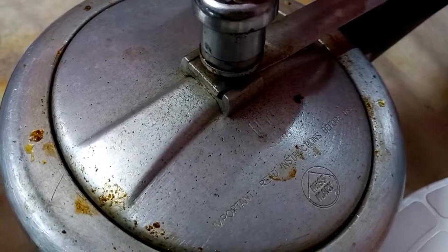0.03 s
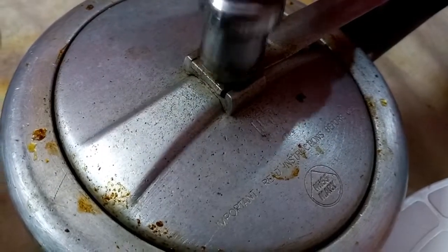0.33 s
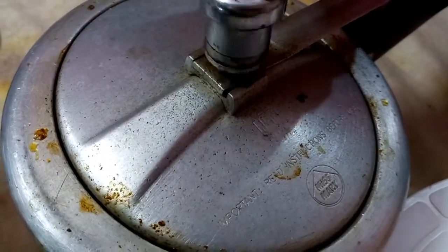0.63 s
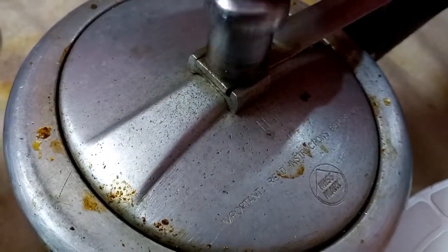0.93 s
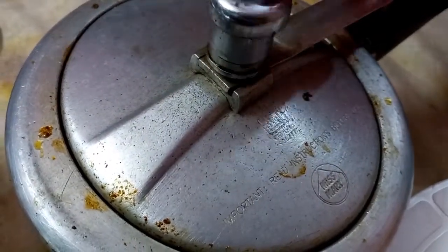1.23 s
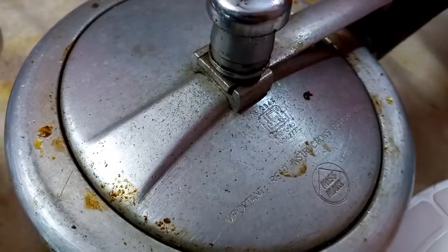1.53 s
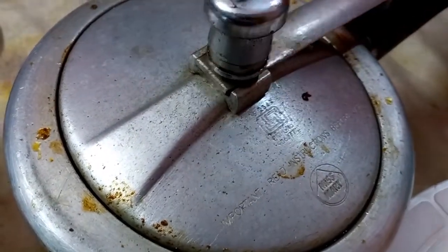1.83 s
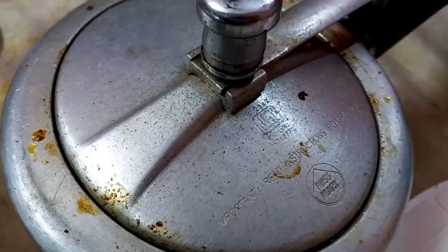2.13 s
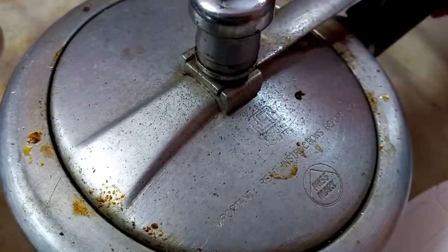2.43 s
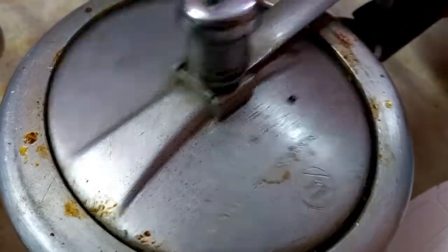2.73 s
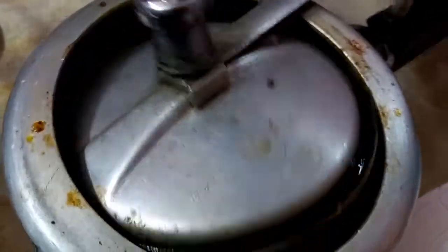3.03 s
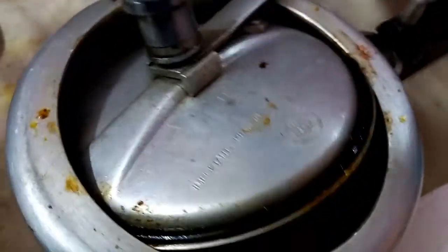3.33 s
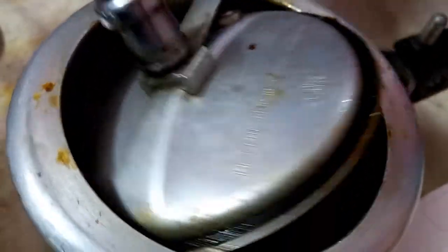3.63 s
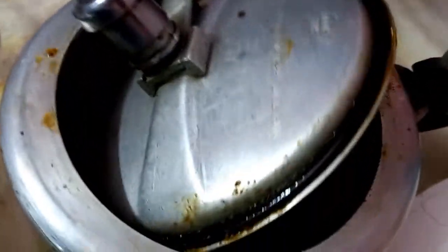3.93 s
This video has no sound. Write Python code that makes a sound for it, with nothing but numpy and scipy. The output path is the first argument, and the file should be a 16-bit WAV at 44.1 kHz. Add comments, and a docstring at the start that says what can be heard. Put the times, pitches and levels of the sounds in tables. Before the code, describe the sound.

A pressure cooker's metal valve weight clacks irregularly from 0.3 to 1.4 seconds, close by, while a steam hiss fades over low rumble and soft thumps. Around 1.8 seconds the handle rubs and its wire catch clicks free. The weight ticks once at 2.5 seconds. The lid drops loose with two clunks near 2.9 and 3.15 seconds, then scrapes along the rim with lighter knocks until 4 seconds.

```python
"""A pressure cooker, close by in a small kitchen, over a low handling rumble.
Until 1.5 s the last steam hisses out and fades while the valve weight clacks on the vent.
Near 1.8 s the handle is squeezed, its wire catch slips off and the handle springs free.
The weight ticks once more; near 2.9 s and 3.15 s the lid drops loose with two clunks,
then scrapes along the rim as it is tilted out."""
import sys
import numpy as np
from scipy import signal
from scipy.fft import rfft, irfft
from scipy.io import wavfile

SR = 44100
rng = np.random.default_rng(int(sys.argv[2]) if len(sys.argv) > 2 else 0)


def to_wav(sig):
    """Store sig (one row per channel, or 1-D mono) as 16-bit WAV at the path in sys.argv[1].

    Samples outside -1..1 are clipped; the rate is SR.
    """
    pcm = np.clip(np.atleast_2d(sig), -1, 1) * 32767
    pcm = np.round(pcm).astype(np.int16)
    wavfile.write(sys.argv[1], SR, pcm.T)  # frames by channels


N = 176400

# room noise spectrum: freq_hz, gain_db
FLOOR_EQ = [(130, -6.5), (330, 2.5), (870, -6.5), (2060, -5), (3350, -16), (16000, -34)]
FLOOR_DB = -44

# handling rumble envelope: time_s, level_db
RUMBLE_ENV = [(0, -28), (.25, -37), (.43, -32.5), (.55, -35), (1.0, -40), (1.1, -26.5), (1.25, -51),
              (1.65, -28.5), (1.93, -36), (1.98, -51), (2.8, -44), (3.8, -41.5)]
# rumble spectrum: freq_hz, gain_db
RUMBLE_EQ = [(45, -30), (72, -2), (120, -5), (240, -19), (380, -28)]
RUMBLE_SIDE_GAIN, RUMBLE_SWELL_DB = 0.74, 3
# dull low thumps, from handling and from the valve weight landing: start_s, level_db
BUMPS = [(0.452, -14.5), (1.06, -16), (1.091, -15), (1.331, -16.5), (1.468, -20), (1.588, -13),
         (1.636, -19)]
BUMP_HZ, BUMP_RISE_S, BUMP_T60_S = 138.7, 0.0032, 0.09

# steam flow envelope: time_s, level_db
STEAM_ENV = [(0, -24), (.3, -29.5), (.42, -36.5), (.62, -36.5), (1.3, -46), (1.5, -62), (4, -51)]
# jet spectrum: freq_hz, gain_db
JET_EQ = [(400, -6), (800, -8), (2000, -6), (2700, -13), (3800, -10.5), (4500, -4), (6300, 3), (7400, 1),
          (8400, -14), (10000, -12), (11900, -5.5), (14000, -14)]
STEAM_FLICKER_DB = 1.5

# rub of the squeezed handle: time_s, level_db
SQUEEZE_ENV = [(1.72, -65), (1.81, -29.5), (1.85, -36), (1.93, -40), (2.02, -92)]
# handle rub and tick spectrum: freq_hz, gain_db
SQUEEZE_EQ = [(250, -14.5), (590, 7), (850, -10), (1800, -9.5), (2090, 1), (2400, -8), (16000, -25.5)]
# wire catch slipping over the handle: start_s, level_db, ring_rel_db
CATCH_SLIPS = [(1.75, -29.5, -21), (1.8762, -21.5, -4.5), (1.9089, -20, 2.5), (1.9347, -18.5, -8),
               (1.949, -27, 4.5), (1.9926, -30, -3), (2.951, -14, -24)]
# wire mode: pitch_hz, t60_s, level_db
CATCH_MODES = [(11180, 0.064, -2)]
# catch click spectrum: freq_hz, gain_db
CATCH_EQ = [(2000, -4.5), (2800, -8), (3600, -2), (5300, 2), (9000, -5.5), (12300, 2.5), (16000, -14)]
CATCH_T60_S = 0.054
RASP_HZ, RASP_WIDTH_HZ, RASP_DB, RASP_T60_S = 2830, 360, -9.5, 0.2  # rough ring of the wire
# sprung handle letting go: start_s, level_db
HANDLE_SNAPS = [(2.058, -26.5), (2.2148, -33)]
# handle modes: pitch_hz, t60_s, level_db
HANDLE_MODES = [(337, 0.14, -7), (581.3, 0.11, -1), (604, 0.73, -13.5), (1210, 0.058, -15),
                (2076, 0.26, -10.5)]
HANDLE_TICK_DB, HANDLE_TICK_T60_S = -4, 0.15

# lid hitting the rim: start_s, level_db, low_mode_rel_db
LID_KNOCKS = [(2.6651, -31, -15), (2.7936, -22, -22), (2.9035, -21, -15), (2.9125, -10.5, -22),
              (2.9165, -11, -10), (2.9265, -13.5, -26), (2.9369, -7, -6.5), (2.947, -16, -13),
              (2.9735, -14.5, 5.5), (2.981, -17.5, -6), (3.1374, -11, 0.5), (3.1432, -7, -23),
              (3.153, -12, 6.5), (3.1605, -11, -17), (3.17, -13, -3), (3.181, -19.5, 7), (3.4214, -28, 11),
              (3.601, -13, -0.5), (3.619, -28, 11.5), (3.9157, -21.5, 4.5), (3.9575, -40, -11),
              (3.9788, -21, -11)]
# lowest lid mode: pitch_hz, t60_s, level_db
LID_LOW_MODE = [(473.6, 0.065, -3.5)]
# lid mode rung as the seal lets go: pitch_hz, t60_s, level_db
LID_RELEASE_MODE = [(730, 0.15, 0)]
RELEASE_S, RELEASE_DB = 2.9125, -11
# upper lid modes: pitch_hz, t60_s, rel_db
LID_MODES = [(980, 0.13, -44), (1071, 0.11, -22), (1564, 0.12, -19.5), (2296, 0.14, -21.5),
             (3100, 0.041, -13), (3730, 0.029, -8.5), (4430, 0.03, -7.5), (5100, 0.03, -12.5),
             (5515, 0.033, -6.5)]
# metal-on-metal chatter spectrum: freq_hz, gain_db
CHATTER_EQ = [(100, -19), (480, -3.5), (1300, -3), (1950, -12), (3900, -2.5), (6200, -7.5), (9500, -19),
              (16000, -24.5)]
CHATTER_GRAIN_DB, CHATTER_T60_S, CHATTER_RING_DB = 2.5, 0.031, -8
# lid sliding on the rim: time_s, level_db
SLIDE_ENV = [(2.5, -67), (2.68, -44), (2.86, -38), (3.07, -47.5), (3.12, -29), (3.21, -48), (3.38, -47),
             (3.43, -34), (3.55, -39.5), (3.75, -31), (3.88, -33), (4.0, -40)]
# sliding friction spectrum: freq_hz, gain_db
SLIDE_EQ = [(210, 2.5), (360, -7.5), (480, -2), (650, -13), (930, -8), (4350, -22.5), (16000, -33.5)]
SLIDE_GRAIN_DB, SLIDE_GRAIN_HZ, SLIDE_JERK_DB, SLIDE_RING_DB = 4, 701.4, 2, -4
GRIT_PER_S, GRIT_DB = 64, -15

# weight hitting the vent pipe: start_s, level_db, crack_rel_db, ping_rel_db
CLACKS = [(0.3324, -5.5, -3.5, 0), (0.4457, -16, 2.5, 7), (0.4509, -8.5, 5, -5), (0.6203, -2, -14.5, -11),
          (0.6285, -6, -4.5, -23), (0.713, -15, -3, -5), (0.7789, -6, -6.5, -29), (0.7898, -5.5, -4.5, -8),
          (0.884, -18.5, 3, 7.5), (0.8911, -19, 3.5, 8.5), (.9538, -6, -5.5, -18), (0.9629, -6, -6, -1.5),
          (1.0609, -13, -2.5, 6), (1.115, -10, -11, -5), (1.1215, -1.5, -4, -9.5), (1.2263, -20, -0.5, 3),
          (1.2398, -17, -1.5, 3.5), (1.3142, -11.5, -7.5, -28), (1.3292, 0, -8, -7),
          (1.342, -10.5, -6, 0.5), (2.5001, -20, 4.5, 4)]
# weight modes: pitch_hz, t60_s, left_db, right_db
WEIGHT_MODES = [(2384, 0.042, -18, -42), (2900, 0.027, -24, -19), (3666, 0.021, -4.5, -22),
                (4320, 0.0093, -1.5, -14), (7690, 0.028, -30.5, -21)]
# ping mode of the weight: pitch_hz, t60_s, left_db, right_db
WEIGHT_PING = [(5550, 0.033, -42, 0)]
CLACK_DETUNE_FRAC, PING_DETUNE_FRAC, STRIKE_SPREAD_DB = 0.025, .007, 3.5  # no two landings alike
# contact crack spectrum: freq_hz, gain_db
CRACK_EQ = [(80, -4), (300, -1), (1500, -2.5), (1900, -21), (2400, -5.5), (5000, 2), (9500, -17.5),
            (12000, -13), (16000, -25)]
CRACK_T60_S = 0.018
THUMP_DB, THUMP_DAMPING_T60_S = -11, 0.056  # a hard landing also thumps the lid

# reverb spectrum: freq_hz, gain_db
ROOM_EQ = [(300, -5), (3000, 4.5), (15000, 0.5)]
ROOM_DB, ROOM_T60_S, WALL_DELAY_S = -10, 0.19, .012
# microphone balance: freq_hz, left_minus_right_db
MIC_BALANCE = [(300, 4.5), (1300, 0.5), (5600, -0.5), (8000, 1.5), (12300, -8.5), (16000, -4)]
RIGHT_LAG_S, LOWPASS_HZ = .00015, 16000


def undb(db):
    """Decibels to gain."""
    return 10 ** (np.asarray(db) / 20)


def unit(x):
    """Scale to rms 1."""
    return x / np.sqrt(np.mean(x ** 2))


def envelope(points):
    """Gain over time from (time_s, level_db) points."""
    return undb(np.interp(np.arange(N) / SR, *np.array(points).T))


def convolve(x, response):
    """Apply an impulse response; keep N samples."""
    return signal.fftconvolve(np.atleast_2d(x), response, axes=1)[:, :N]


def min_phase(x, bin_db):
    """Causal filter with a gain per frequency bin."""
    cepstrum = irfft(np.log(undb(np.atleast_2d(bin_db))))
    fold = np.r_[1, np.full(N // 2 - 1, 2), np.zeros(N // 2)]
    response = irfft(np.exp(rfft(cepstrum * fold)))
    return convolve(x, response[:, :N // 20])


def eq(x, points):
    """Filter by (freq_hz, gain_db) points, rolling off outside them; keeps white-noise power."""
    hz, db = np.array(points, float).T
    log_hz = np.log(hz)
    log_bins = np.log(np.maximum(np.fft.rfftfreq(N, 1 / SR), 1))
    low_cut_db = 40 * np.maximum(log_hz[0] - log_bins, 0)
    high_cut_db = 20 * np.maximum(log_bins - log_hz[-1], 0)
    gain = unit(undb(np.interp(log_bins, log_hz, db) - low_cut_db - high_cut_db))
    return min_phase(x, 20 * np.log10(gain))


def wander(rate_hz):
    """Smooth random motion, rms 1."""
    points = rng.standard_normal(N)
    return unit(np.interp(np.arange(N) / SR * rate_hz, np.arange(N), points))


def decay(t60_s):
    """Exponential decay, 0.5 s long."""
    return np.exp(-np.log(1000) * np.arange(SR // 2) / SR / t60_s)


def ring(modes):
    """Damped sines of a struck body; one level, or one per side."""
    t = np.arange(SR // 2) / SR
    return sum(undb(db)[:, None] * decay(t60_s) * np.sin(2 * np.pi * hz * t) for hz, t60_s, *db in modes)


def detuned(mode, spread_frac):
    """One mode, randomly off pitch."""
    hz, *rest = mode
    return ring([(hz * (1 + spread_frac * rng.standard_normal()), *rest)])


def stereo_noise(size):
    """Noise: bass shared, treble independent per side."""
    shared, own = rng.standard_normal(size), rng.standard_normal((2, size))
    low, high = (signal.butter(2, 1000, kind, fs=SR) for kind in ("low", "high"))
    return signal.lfilter(*low, shared) + signal.lfilter(*high, own)


def burst(t60_s, grain_db=0):
    """Dying contact noise; grain_db roughens it into tiny impacts."""
    grains = undb(grain_db * np.repeat(rng.standard_normal(SR // 20), 20))[:SR // 2]
    noise = stereo_noise(SR // 2) * grains * decay(t60_s)
    return unit(noise) * np.sqrt(np.mean(decay(t60_s) ** 2))


def add(out, start_s, sound):
    """Mix a sound in at start_s."""
    i = int(start_s * SR)
    out[:, i:i + sound.shape[1]] += sound[:, :N - i]


def room_noise():
    """Quiet, steady noise floor."""
    return undb(FLOOR_DB) * eq(stereo_noise(N), FLOOR_EQ)


def kitchen(x):
    """Add short reverb, starting at the nearest wall's echo."""
    tail = stereo_noise(SR // 2) * decay(ROOM_T60_S)
    tail /= np.sqrt(np.sum(tail ** 2) / 2)
    wet = np.zeros((2, N))
    add(wet, WALL_DELAY_S, convolve(x.mean(axis=0), tail))
    return x + undb(ROOM_DB) * eq(wet, ROOM_EQ)


def microphones(x):
    """Bass leans left, high treble right; sound reaches the left first."""
    balance_db = np.interp(np.fft.rfftfreq(N, 1 / SR), *np.array(MIC_BALANCE).T)
    left, right = min_phase(x, np.array([balance_db, -balance_db]) / 2)
    late_right = np.pad(right, (int(RIGHT_LAG_S * SR), 0))[:N]
    return np.array([left, late_right])


def rumble_and_thumps():
    """Swelling handling rumble; dull low thumps from handling and from the valve weight landing."""
    mid, side = rng.standard_normal((2, N))
    noise = mid + RUMBLE_SIDE_GAIN * side * np.array([[1], [-1]])
    out = unit(eq(noise, RUMBLE_EQ)) * envelope(RUMBLE_ENV) * undb(RUMBLE_SWELL_DB * wander(rate_hz=14))
    attack = 1 - np.exp(-np.arange(SR // 2) / SR / BUMP_RISE_S)
    bump = attack * ring([(BUMP_HZ, BUMP_T60_S, -2), (BUMP_HZ * 1.67, BUMP_T60_S / 2, -2)])
    for start_s, db in BUMPS:
        add(out, start_s, undb(db) * bump)
    return out


def steam():
    """The jet dies down as pressure falls; a faint hiss then creeps back."""
    jet = eq(stereo_noise(N), JET_EQ)
    return jet * envelope(STEAM_ENV) * undb(STEAM_FLICKER_DB * wander(rate_hz=24.87))


def latch():
    """The squeezed handle rubs, its wire catch clicks and rings, the handle springs free."""
    tones, clicks, ticks, rasp = np.zeros((4, 2, N))
    wire, handle = ring(CATCH_MODES), ring(HANDLE_MODES)
    for start_s, db, ring_db in CATCH_SLIPS:
        add(tones, start_s, undb(db + ring_db) * wire)
        add(clicks, start_s, undb(db) * burst(CATCH_T60_S, grain_db=4.0))
        add(rasp, start_s, undb(db + ring_db + RASP_DB) * burst(RASP_T60_S))
    band = signal.butter(2, [RASP_HZ - RASP_WIDTH_HZ / 2, RASP_HZ + RASP_WIDTH_HZ / 2], "band", fs=SR)
    tones += signal.lfilter(*band, rasp) * np.sqrt(SR / 2 / RASP_WIDTH_HZ)  # make-up gain
    for start_s, db in HANDLE_SNAPS:
        add(tones, start_s, undb(db) * handle)
        add(ticks, start_s, undb(db + HANDLE_TICK_DB) * burst(HANDLE_TICK_T60_S, grain_db=-6.5))
    rub = unit(stereo_noise(N) * undb(1.9 * wander(rate_hz=420))) * envelope(SQUEEZE_ENV)
    return tones + eq(clicks, CATCH_EQ) + eq(rub + ticks, SQUEEZE_EQ)


def lid():
    """The lid breaks its seal, bounces, then scrapes over grit; knocks and friction ring it."""
    tones, chatter = np.zeros((2, 2, N))
    low_mode, body = ring(LID_LOW_MODE), ring(LID_MODES)
    body /= np.sqrt(np.sum(body ** 2))
    add(tones, RELEASE_S, undb(RELEASE_DB) * ring(LID_RELEASE_MODE))
    for start_s, db, low_db in LID_KNOCKS:
        add(tones, start_s, undb(db + low_db) * low_mode)
        add(chatter, start_s, undb(db) * burst(CHATTER_T60_S, CHATTER_GRAIN_DB))
    knocks = eq(chatter, CHATTER_EQ) + undb(CHATTER_RING_DB) * convolve(chatter, body)
    friction = stereo_noise(N)
    roughness_db = SLIDE_GRAIN_DB * wander(SLIDE_GRAIN_HZ) + SLIDE_JERK_DB * wander(rate_hz=50)
    rub = eq(unit(friction * undb(roughness_db)), SLIDE_EQ) * envelope(SLIDE_ENV)
    grit = unit((rng.random(N) < GRIT_PER_S / SR) * rng.standard_normal((2, N)))
    ticks = undb(GRIT_DB) * eq(grit, CHATTER_EQ) * envelope(SLIDE_ENV)
    return tones + knocks + rub + ticks + undb(SLIDE_RING_DB) * convolve(rub, body)


def valve_weight():
    """The weight hits the vent pipe: each contact cracks, rings the weight and thumps the lid."""
    tones, cracks = np.zeros((2, 2, N))
    lid_mode = ring(LID_LOW_MODE) * decay(THUMP_DAMPING_T60_S)
    for start_s, db, crack_db, ping_db in CLACKS:
        body = sum(detuned(mode, CLACK_DETUNE_FRAC) * undb(STRIKE_SPREAD_DB * rng.standard_normal())
                   for mode in WEIGHT_MODES)
        ping = undb(ping_db) * detuned(WEIGHT_PING[0], PING_DETUNE_FRAC)
        thump = undb(crack_db + THUMP_DB) * lid_mode
        add(tones, start_s, undb(db) * (body + ping + thump))
        add(cracks, start_s, undb(db + crack_db) * burst(CRACK_T60_S))
    return tones + eq(cracks, CRACK_EQ)


def scene():
    """Cooker parts with reverb; steam, rumble, low thumps and room noise without."""
    floor = room_noise()
    cooker = kitchen(valve_weight() + latch() + lid())
    return microphones(cooker + steam() + rumble_and_thumps() + floor)


def record(dry):
    """Clip at full scale, then low-pass steeply."""
    lowpass = signal.ellip(10, .2, 70, LOWPASS_HZ, fs=SR, output="sos")
    return signal.sosfilt(lowpass, np.clip(dry, -1, 1))


dry = scene()
out = record(dry)
to_wav(out)
```